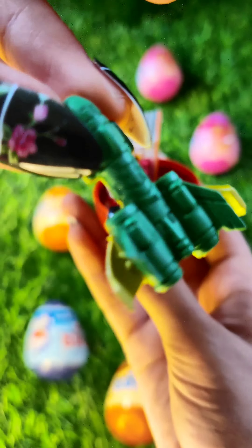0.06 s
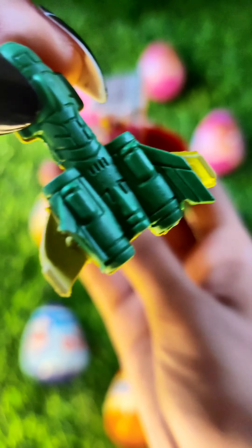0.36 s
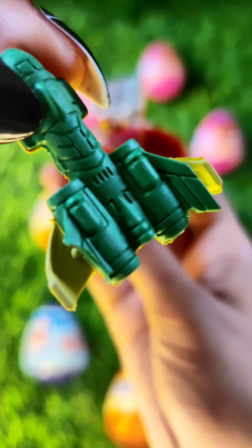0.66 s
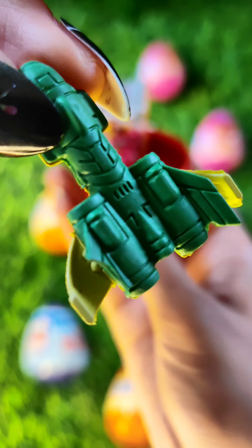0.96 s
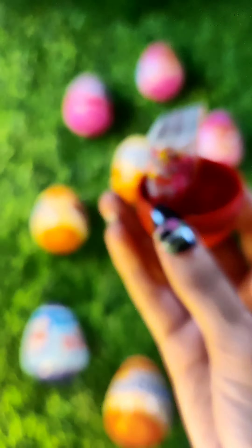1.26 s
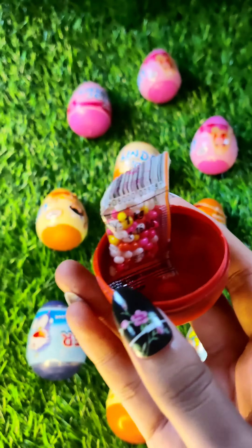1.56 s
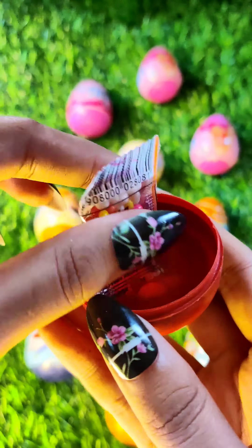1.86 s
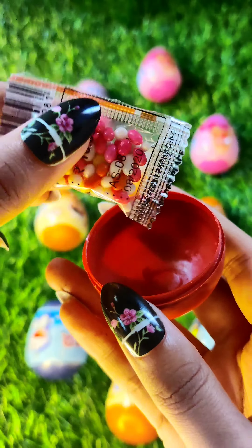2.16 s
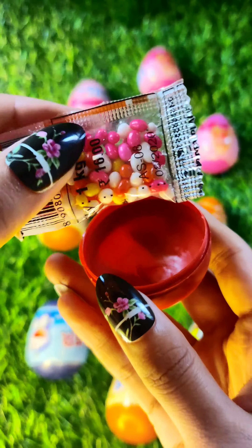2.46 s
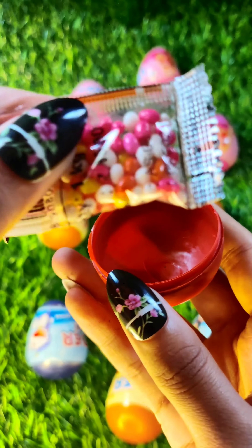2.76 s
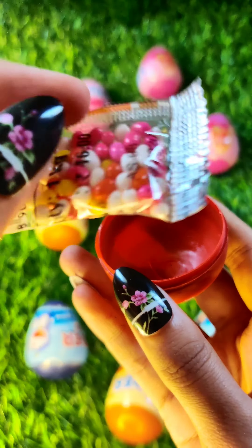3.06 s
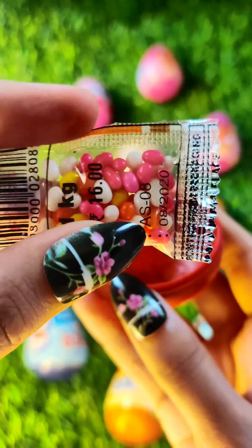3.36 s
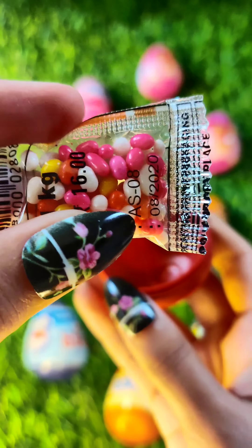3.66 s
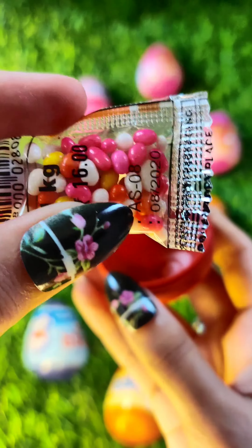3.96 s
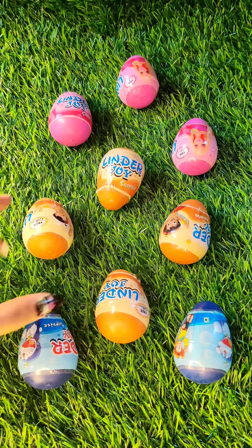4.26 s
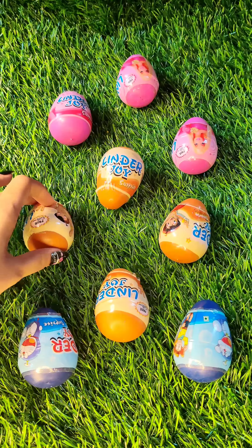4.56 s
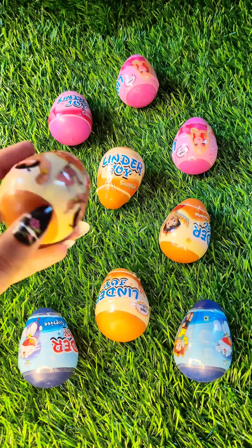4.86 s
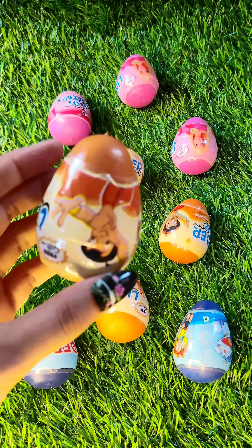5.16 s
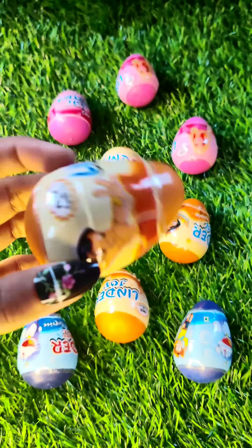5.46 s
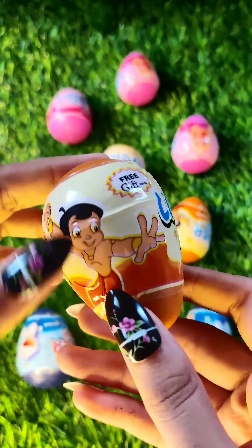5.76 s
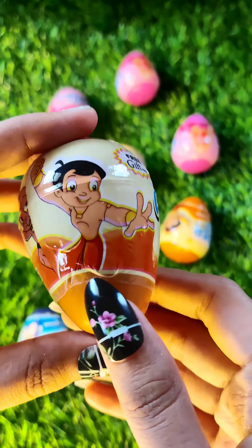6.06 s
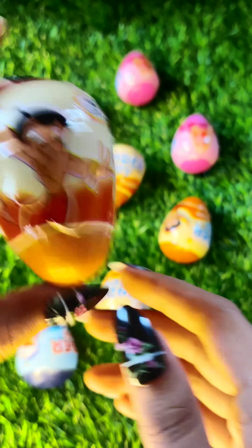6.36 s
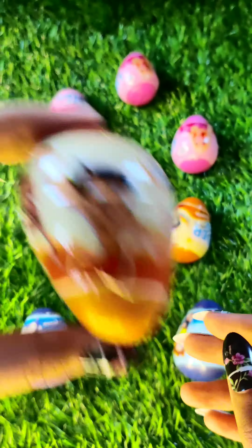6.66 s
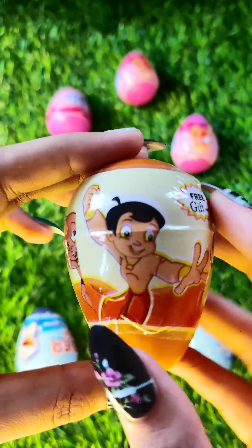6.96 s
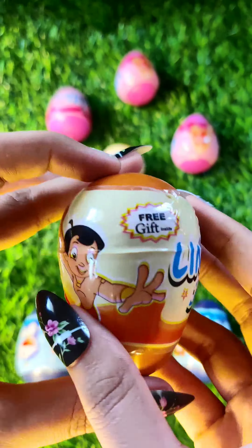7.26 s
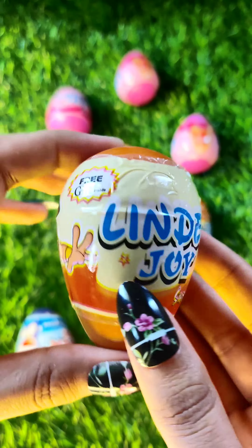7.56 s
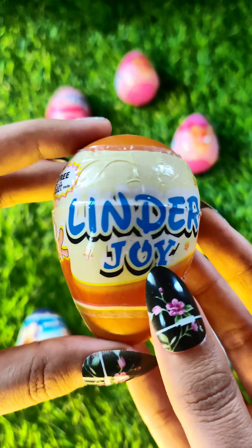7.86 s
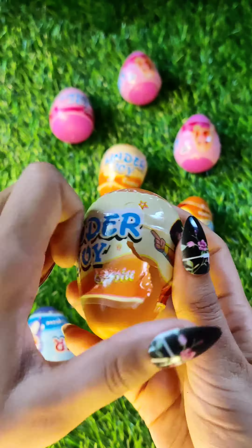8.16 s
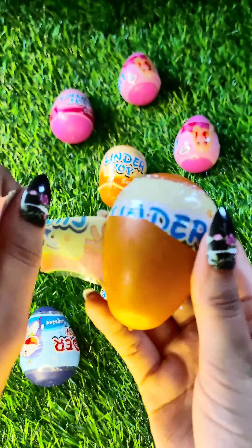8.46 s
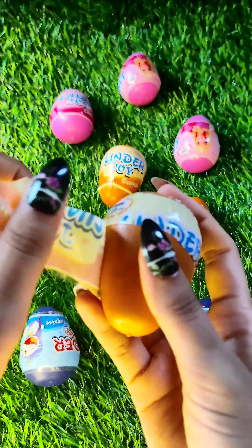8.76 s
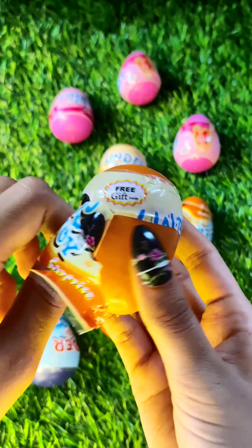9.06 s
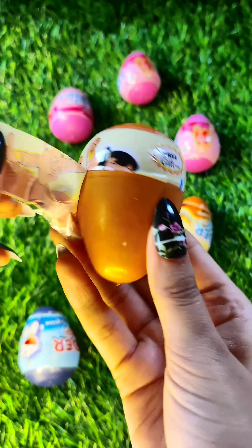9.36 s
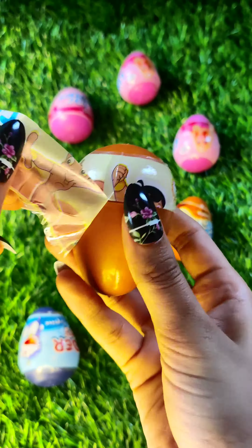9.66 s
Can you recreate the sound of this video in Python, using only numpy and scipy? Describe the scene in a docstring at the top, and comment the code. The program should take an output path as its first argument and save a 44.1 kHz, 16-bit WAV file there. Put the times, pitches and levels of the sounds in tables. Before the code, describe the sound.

The first second and a half holds only faint room tone, hiss and a low handling rumble in a small room. From about 1.5 to 3.7 seconds, fingers turn a small plastic candy packet close to the microphone, a little to the left, giving irregular crisp crackles and short rustles. From around 4 seconds the rumble swells and soft, low bumps come and go as a wrapped candy egg is picked up. Until nearly 8 seconds it stays quiet, with a few light nail ticks on the hollow shell and faint rubbing of its wrapper. At about 7.9 seconds a sharp snap starts the peeling. The foil tears and crinkles in a dense run of snaps and gritty slides, the loudest part, with peaks near 8.5, 9.3 and 9.9 seconds, continuing to the end at about 10 seconds.

```python
"""Unwrapping a candy egg

A small room, a phone's stereo microphone close to the hands. Fingers turn a small plastic packet,
pick up a foil-wrapped egg and peel it. The films buckle in sharp snaps and slide in gritty rustles;
the walls answer softly. Underneath: room tone, hiss and a low rumble that swells as the hands move."""
import sys
import numpy as np
from scipy import signal
from scipy.fft import rfft, irfft, next_fast_len
from scipy.io import wavfile
from scipy.ndimage import uniform_filter1d

SR = 44100
rng = np.random.default_rng(int(sys.argv[2]) if len(sys.argv) > 2 else 0)


def wav_out(sig):
    """Save sig, one row per channel (or a flat mono array), as 16-bit PCM at SR to the path in sys.argv[1]."""
    wavfile.write(sys.argv[1], SR, np.round(np.clip(np.atleast_2d(sig).T, -1, 1) * 32767).astype(np.int16))


N = 436590
T = np.arange(N) / SR


def undb(db):
    """Decibels to gain."""
    return 10 ** (np.asarray(db) / 20)


def unit(x):
    """Scale each channel to rms 1."""
    return x / np.sqrt(np.mean(x ** 2, axis=-1, keepdims=True) + 1e-20)


def curve(rows):
    """Gain over time from (time_s, level_db) rows, silent outside them."""
    return undb(np.interp(T, *np.transpose(rows), left=-np.inf, right=-np.inf))


def add(out, start_s, x):
    """Mix a stereo sound in."""
    i = int(start_s * SR)
    out[:, i:i + x.shape[1]] += x[:, :N - i]


def band(x, low_hz, high_hz, order):
    """Causal band-pass."""
    edges = [low_hz, min(high_hz, .48 * SR)]
    return signal.sosfilt(signal.butter(order, edges, "bp", fs=SR, output="sos"), x)


def colour(x, points):
    """Shape a long sound by (freq_hz, gain_db) points."""
    hz, db = np.transpose(points)
    f = np.maximum(np.fft.rfftfreq(N, 1 / SR), 1)
    return irfft(rfft(x) * undb(np.interp(np.log(f), np.log(hz), db)), N)


def stereo_noise(n, likeness):
    """Left and right noise whose correlation is likeness."""
    shared = np.sqrt(likeness) * rng.standard_normal(n)
    return shared + np.sqrt(1 - likeness) * rng.standard_normal((2, n))


def wander(rate_hz):
    """A smooth random drift around zero."""
    step = int(SR / rate_hz)
    stairs = np.repeat(rng.standard_normal(N // step + 1), step)
    return 0.89 * uniform_filter1d(stairs, step)[:N]


# Rumble at the microphone, before its 3 dB lift: time_s, level_db
RUMBLE_LEVELS = [(0, -46), (.35, -56.5), (.9, -51), (2.8, -52), (3.2, -60), (3.55, -50.5), (3.95, -62),
                 (4.16, -38.5), (4.45, -35), (4.96, -51), (5.12, -37.5), (6.1, -46.5), (6.45, -57),
                 (7.83, -39), (7.97, -61.5), (8.55, -42.5), (8.8, -53.5), (9.16, -36.5), (9.32, -49),
                 (9.9, -48.5)]
# Its spectrum: freq_hz, gain_db
RUMBLE_SPECTRUM = [(11, -18.5), (20, 11), (45, 5), (65, -5.5), (90, -5.5), (150, -25), (300, -34.5),
                   (600, -40.5), (1200, -52.5), (3000, -54.5), (6000, -100)]


def rumble():
    """Uneven rumble under the moving hands, unlike in the two microphone ports."""
    low = unit(colour(stereo_noise(N, 0.13), RUMBLE_SPECTRUM))
    swells = band(low, 41, 200, order=1) * (undb(1.6 * wander(8.4)) - 1)
    return undb(3.0) * (low + swells) * curve(RUMBLE_LEVELS)


# The room at rest: freq_hz, gain_db
ROOM_SPECTRUM = [(40, -13), (95, 0.5), (150, -5.5), (200, 0.5), (300, -12.5), (650, -15.5), (900, -32),
                 (1500, -27.5), (4000, -69)]


def room_tone():
    """The steady low noise of the room, much the same on both sides."""
    return undb(-64.5) * unit(colour(stereo_noise(N, 0.82), ROOM_SPECTRUM))


# Hiss behind the hands: time_s, level_db
HISS_LEVELS = [(0, -71), (4.05, -69.5), (4.3, -67), (5.5, -69.5), (6.3, -71), (7, -72), (7.7, -69),
               (8.2, -70.5), (9.9, -64)]
# Its spectrum: freq_hz, gain_db
HISS_SPECTRUM = [(300, 14), (900, 4), (1350, 2), (2000, -1.5), (3700, -5), (6200, -9.5), (10000, -8.5),
                 (15000, -2.5), (16000, -8.5)]


def hiss():
    """Soft hiss, wide in the mids and centred in the treble."""
    mids = band(stereo_noise(N, 0.017), 615, 4860, order=2)
    treble = band(stereo_noise(N, 0.98), 6600, 23400, order=2)
    return unit(colour(mids + treble, HISS_SPECTRUM)) * curve(HISS_LEVELS)


# Hands bumping, close to the phone: start_s, level_db, pitch_hz
HAND_BUMPS = [(0.734, -37.5, 75), (2.034, -30.5, 56.5), (2.801, -40, 82), (4.149, -30, 54),
              (4.775, -28, 69.5), (5.382, -30, 64), (5.552, -30, 72.4), (6.101, -37.5, 81),
              (7.81, -31, 76.4), (9.443, -30, 62.4)]


def hand_bumps():
    """Soft knocks of a cycle or two, felt more than heard."""
    out, t = np.zeros((2, N)), np.arange(SR // 5) / SR
    age = t / 0.0053
    envelope = age * np.exp(1 - age)
    for start_s, level_db, pitch_hz in HAND_BUMPS:
        phase = rng.normal(0, 1.0, (2, 1))
        add(out, start_s, undb(level_db) * envelope * np.sin(2 * np.pi * pitch_hz * t + phase))
    return out


def ring(x, modes):
    """The film or egg passes each impulse and rings briefly at its resonances."""
    return x + sum(undb(gain_db) * signal.lfilter(*signal.iirpeak(hz, hz / width_hz, fs=SR), x)
                   for hz, width_hz, gain_db in modes)


# The film's body, crack and sizzle ranges: low_hz, high_hz
FILM_BANDS = [(400, 2500), (2500, 9000), (9000, 16000)]


def voice(x, crack_db, body_db, sizzle_db, backing_db, length_s):
    """Share energy between flexing sheet, crack and sizzle; body and sizzle are relative to the crack."""
    levels = undb(crack_db + np.array([body_db, 0, sizzle_db]))
    film = sum(gain * unit(band(x, *edges, order=4)) for gain, edges in zip(levels, FILM_BANDS))
    # What the film rests on moves too.
    backing = undb(backing_db) * levels[0] * unit(band(x, 258, 686, order=2))
    return (film + backing) * np.sqrt(length_s * SR / x.shape[1])


def grit(n, spread_db, per_s, likeness):
    """Countless tiny slips, each a brief puff of noise."""
    sizes = undb(spread_db * np.minimum(rng.exponential(size=n), 4))
    slips = sizes * (rng.random(n) < per_s / SR)
    envelope = signal.lfilter([1], [1, -np.exp(-1 / (0.00033 * SR))], slips)
    return envelope * stereo_noise(n, likeness)


# Close slides, before a 0.5 dB trim: start_s, length_s, crack_db, body_db, sizzle_db
SLIDES = [(1.545, 0.15, -62, -3, -4), (1.966, 0.021, -41, -11, -7), (2.231, 0.14, -59, -7, -6),
          (2.908, 0.028, -47, -5, -0.5), (3.041, .19, -61, -8.5, -4), (3.677, 0.041, -61.5, -15, 4),
          (4.841, 0.024, -69, -10, -1), (5.676, 0.12, -71, -4, -10), (6.474, 0.023, -64, -1, -9),
          (6.509, 0.029, -59.5, -2.5, -11), (6.595, .08, -66, 3, -9), (6.708, 0.062, -62, 0.5, -1.5),
          (7.966, 0.043, -46.5, -5, 2), (8.108, 0.043, -52.5, -7, -2), (8.249, 0.12, -60.5, -20, -5),
          (8.44, 0.061, -42.5, -14, -11), (8.466, .025, -35, -5, -11), (8.784, 0.065, -49, -10, -5.5),
          (8.9, 0.15, -49.5, -10, 1), (9.265, .075, -42.5, -6.5, -2), (9.428, 0.13, -51.5, -5, 1),
          (9.629, 0.13, -50.5, -5.5, -2), (9.876, 0.043, -35.5, -11, 6)]


def slides():
    """Film slides or peels, or the toy shifts in the egg: dense stick-slip grit with small catches."""
    out = np.zeros((2, N))
    egg_from_s, foil_from_s = EGG_TICKS[0][0], FOIL_SNAPS[0][0]
    for start_s, length_s, crack_db, body_db, sizzle_db in SLIDES:
        t = np.arange(int((length_s + 0.11) * SR)) / SR
        rise = np.minimum(t / (0.14 * length_s), 1)
        release = np.exp(-np.maximum(t - 0.78 * length_s, 0) / 0.012)
        modes = (PACKET_RESONANCES if start_s < egg_from_s else
                 EGG_RESONANCES if start_s < foil_from_s else FOIL_RESONANCES)
        slips = grit(len(t), spread_db=1.5, per_s=3500, likeness=0.34)
        catches = undb(13.5) * grit(len(t), spread_db=2.0, per_s=120, likeness=0.8)
        rustle = ring(rise * release * (slips + catches), modes)
        rustle = voice(rustle, crack_db - 0.5, body_db, sizzle_db, backing_db=-16, length_s=length_s)
        add(out, start_s, rustle)
    return out


def snaps(rows, modes, low_hz, backing_db, likeness, crack_share, facet_db, facet_q, facet_hz, left_db):
    """A crease flips or a nail ticks: a sharp crack, then a duller flutter that lasts a little longer."""
    out, t = np.zeros((2, N)), np.arange(SR // 20) / SR
    body_db_per_octave = 19  # a larger patch of film has more body and rings lower
    for start_s, crack_db, body_db, sizzle_db, decay_ms in rows:
        decay_s = decay_ms / 1000
        pitch_hz = facet_hz * 2 ** (-body_db / body_db_per_octave) * np.exp(rng.normal(0, 0.19))
        pitch_hz = min(pitch_hz, SR / 4)
        pan_db = rng.normal(left_db, 3)
        pan = unit(undb(np.array([pan_db, -pan_db]) / 2))[:, None]
        spike = crack_share * np.exp(-t / 0.000082)
        crack = (np.exp(-t / (0.81 * decay_s)) + spike) * stereo_noise(len(t), likeness)
        flutter = np.exp(-t / (1.88 * decay_s)) * stereo_noise(len(t), likeness)
        flutter = 0.56 * band(flutter, 160, 9100, order=1)
        # The film is taut or slack by chance.
        detuned = [(hz * np.exp(rng.normal(0, 0.061)), width_hz, db) for hz, width_hz, db in modes]
        snap = ring(crack + flutter, detuned)
        snap = ring(snap, [(pitch_hz, pitch_hz / facet_q, facet_db)])  # the flat facet beside the crease
        snap = band(snap, low_hz, SR, order=2)  # a small sheet radiates no bass
        add(out, start_s, pan * voice(snap, crack_db, body_db, sizzle_db, backing_db, length_s=0.0062))
    return out


def settling(rows, held_s, rest_db, stir_db, settle_s):
    """Gain of a wrapper's unrest: slight while held; each snap stirs it up and it settles again."""
    power = undb(rest_db) ** 2 * ((T > held_s[0]) & (T < held_s[1]))
    for start_s, crack_db, *_ in rows:
        fade = (T > start_s) * np.exp(-2 * np.abs(T - start_s) / settle_s)
        power += undb(crack_db + stir_db) ** 2 * fade
    return np.sqrt(power)


def creasing(unrest, modes, spread_db, per_s, patchy_db):
    """A held wrapper never rests: faint crackle under the fingers."""
    crackle = ring(grit(N, spread_db, per_s, likeness=0.59), modes)
    crackle = band(crackle, 960, 16200, order=1)
    return unit(crackle) * unrest * undb(patchy_db * wander(45))


# The packet, nearest the microphone, to the left: start_s, crack_db, body_db, sizzle_db, decay_ms
PACKET_SNAPS = [(1.5635, -49.5, -11, -12, 3.1), (1.5998, -62.5, 15.5, -4, 1.5), (1.635, -48.5, -1, -7, 4.1),
                (1.874, -55, -7, -0.5, 3), (1.9026, -53, -0.5, -13, 3.1), (1.945, -41, -1.5, 1.5, 3.3),
                (1.9711, -33.5, -2, -2.5, 4.3), (2.2662, -42, -17, -5, 2.9), (2.3661, -37, -24.5, -29, 1.2),
                (2.429, -42, -24.5, -12, 1.4), (2.4549, -51.5, -3.5, -1, 1.7),
                (2.5757, -33, -19.5, 3.5, 1.9), (2.5874, -42, -23.5, -12, 3), (2.7084, -44.5, -19, -19, 2),
                (2.747, -38.5, -13.5, -1.5, 2.3), (2.7517, -36.5, -9, -5, 0.38),
                (2.8944, -41, -28, -10, 1.9), (2.9286, -35, 2, -7.5, 1.3), (3.1209, -39.5, -24.5, -16, 2.2),
                (3.184, -50, -11, -11, 2.9), (3.2379, -34, -4.5, -4.5, 1.3), (3.3842, -32, -14.5, -5, 1.2),
                (3.5024, -38, -22.5, 7.5, 1.4), (3.6754, -35.5, -13.5, -2, 1.2)]
# Its plastic film: pitch_hz, width_hz, gain_db
PACKET_RESONANCES = [(1750, 1100, -2.5), (2500, 76, -10), (3500, 44, 7), (4780, 2500, 15.5),
                     (7540, 430, 9.5), (10740, 500, -1), (16100, 2600, 12)]


def candy_packet():
    """Thin plastic buckles and crackles as the fingers turn it."""
    buckles = snaps(PACKET_SNAPS, PACKET_RESONANCES, low_hz=930, backing_db=-65, likeness=0.71,
                    crack_share=0.99, facet_db=3.5, facet_q=8.9, facet_hz=1910, left_db=5.0)
    unrest = settling(PACKET_SNAPS, held_s=(1.55, 4.0), rest_db=-76.5, stir_db=-24, settle_s=0.033)
    return buckles + creasing(unrest, PACKET_RESONANCES, spread_db=7.5, per_s=3400, patchy_db=2.5)


# The egg, a little further off, right of centre: start_s, crack_db, body_db, sizzle_db, decay_ms
EGG_TICKS = [(4.369, -61.5, 1, -12, .5), (5.4131, -65.5, 11, -5, 0.67), (5.4868, -52, -27, -14, 0.79),
             (5.4929, -53, -16, -13, 2.1), (5.839, -57, -15, -8, 0.92), (5.8875, -55, -12, -14, 4.2),
             (6.5724, -51.5, -20.5, -7, 3.2), (6.6159, -61, 9, -11, 1.1), (6.7526, -51, 2, -25, 3.2),
             (6.9933, -56.5, -15, -33, 1.3)]
# Fingers rubbing its wrapper: time_s, level_db
EGG_RUBBING = [(4.1, -84), (4.38, -72), (5, -85), (5.35, -73.5), (5.75, -69.5), (6.35, -78), (6.7, -78),
               (7.4, -74), (7.87, -73)]
# Its hollow shell: pitch_hz, width_hz, gain_db
EGG_RESONANCES = [(300, 200, 13), (990, 370, 12), (3360, 270, 11), (4270, 2000, 5), (5550, 100, 6.5),
                  (7300, 150, 9)]


def wrapped_egg():
    """Nails and the toy inside tick on the hollow egg while fingers rub its wrapper."""
    ticks = snaps(EGG_TICKS, EGG_RESONANCES, low_hz=200, backing_db=3.5, likeness=0.2,
                  crack_share=0.23, facet_db=-3.0, facet_q=5.2, facet_hz=1670, left_db=-2.0)
    return ticks + creasing(curve(EGG_RUBBING), EGG_RESONANCES, spread_db=1.0, per_s=1500, patchy_db=4.0)


# The foil coming off, in the same spot: start_s, crack_db, body_db, sizzle_db, decay_ms
FOIL_SNAPS = [(7.896, -20, -12.5, -4.5, 2), (7.9779, -33, -7, -1, 2.1), (7.9984, -24.5, -7.5, -1, 1.6),
              (8.1273, -41.5, -25, -17, 1.5), (8.3161, -39.5, -8, -7, 2.6), (8.3217, -40, -6.5, -6, 2.1),
              (8.4504, -38, -12.5, -1, 1.8), (8.4768, -24.5, -1.5, -1.5, 4.2), (8.4978, -32.5, -10, -8, .6),
              (8.5442, -28.5, -12.5, -3.5, 2.6), (8.6547, -39, -16.5, -6, 2.2), (8.7107, -42, -4, -11, 1.3),
              (8.8053, -38.5, -7.5, -3, 3.7), (8.91, -34.5, -18, -2, 4.3), (8.9464, -34.5, -25, -11, 1.3),
              (8.9812, -27.5, -13.5, 2.5, 4.5), (9.0905, -34, -25, -2, 2.4), (9.2408, -48, -5, -5, 3),
              (9.277, -33, -30.5, 9.5, 1.7), (9.2819, -19.5, -13.5, -20, 0.89),
              (9.3494, -31.5, -14, -6, 4.4), (9.3549, -36.5, -6, -1, 1.3), (9.3892, -35, -9, -10, 2.1),
              (9.4056, -29, -8.5, -7, 3.1), (9.4455, -28, -8, -7.5, 3.3), (9.481, -29.5, -15.5, -11, 1.9),
              (9.5536, -42, -13.5, -9, 4.6), (9.6732, -37, -1.5, -22, 2), (9.7017, -30, -3, -17, 2.4),
              (9.7495, -27.5, -13.5, -1, 2.5), (9.8662, -26, -6.5, -8, 2.3), (9.8807, -28, -5.5, 4, 2.9),
              (9.8868, -21.5, -10.5, -3, 3)]
# The foil on its egg: pitch_hz, width_hz, gain_db
FOIL_RESONANCES = [(346, 210, 6.2), (1105, 560, 1.1), (3210, 120, 8.9), (4470, 1140, 10.6),
                   (5510, 470, 7.7), (6970, 550, 8.6), (12000, 320, 0.81), (15000, 1900, 10.2)]


def peeling_foil():
    """Foil snaps and tears off the egg, crackling as it settles."""
    tears = snaps(FOIL_SNAPS, FOIL_RESONANCES, low_hz=231, backing_db=-6.0, likeness=0.84,
                  crack_share=0.32, facet_db=2.0, facet_q=18, facet_hz=3115, left_db=-1.7)
    unrest = settling(FOIL_SNAPS, held_s=(7.89, 9.1), rest_db=-72, stir_db=-22.5, settle_s=0.065)
    return tears + creasing(unrest, FOIL_RESONANCES, spread_db=0, per_s=1300, patchy_db=0)


# Balance between the phone's two microphone ports: freq_hz, left_minus_right_db
PORT_BALANCE = [(1000, 1.5), (1900, -0.5), (3200, 1), (4500, -0.5), (6200, -6.5), (8000, -3), (10000, 2.5),
                (15000, -0.5)]


def stereo_image(x, lag_ms):
    """The right side sounds a bit later, and louder near 6 kHz; the image narrows in the top treble."""
    size = next_fast_len(N + SR // 10)
    f = np.fft.rfftfreq(size, 1 / SR)
    left, right = rfft(x, size)
    lag_cycles = np.minimum(f * lag_ms / 1000, 1)
    tilt = undb(np.interp(f, *np.transpose(PORT_BALANCE)) / 2)
    late_right = right * np.exp(-2j * np.pi * lag_cycles)
    return irfft(np.array([left * tilt, late_right / tilt]), size)[:, :N]


def room_reverb(x, t60_s, wet_db):
    """The walls of a small room return a diffuse tail, duller as it fades."""
    t = np.arange(SR // 2) / SR
    low = band(stereo_noise(len(t), .2), 250, 7500, order=2) * 1000 ** (-t / t60_s)
    high = band(stereo_noise(len(t), 1.0), 10200, 11000, order=2) * 1000 ** (-t / (0.53 * t60_s))
    onset = np.minimum(t / 0.00067, 1)
    tail = unit((low + 2.5 * high) * onset) / np.sqrt(len(t))
    return undb(wet_db) * signal.fftconvolve(x.mean(0)[None], tail, axes=1)[:, :N]


def scene():
    """Packet close on the left, then the egg and its foil a little further from the phone."""
    close = stereo_image(candy_packet(), lag_ms=0.16)
    further = stereo_image(slides() + wrapped_egg() + peeling_foil(), lag_ms=0.13)
    walls = room_reverb(undb(-5.5) * close + further, t60_s=0.24, wet_db=-14.5)  # nearer sounds drier
    return rumble() + room_tone() + hiss() + hand_bumps() + close + further + walls


def record(dry):
    """The phone cuts the top treble steeply."""
    top_hz = 16050
    return signal.sosfilt(signal.ellip(10, .2, 75, top_hz, fs=SR, output="sos"), dry)


dry = scene()
out = record(dry)
wav_out(out)
```